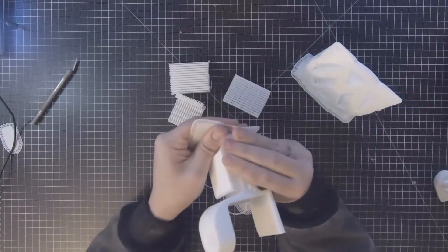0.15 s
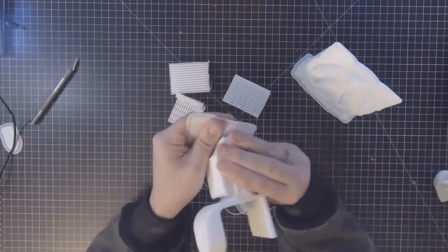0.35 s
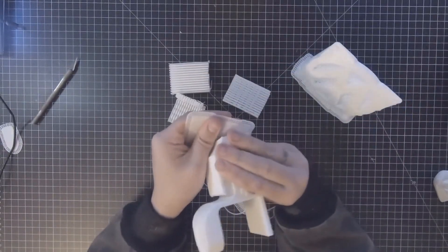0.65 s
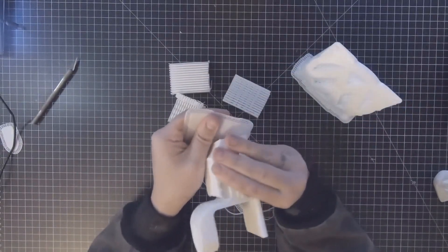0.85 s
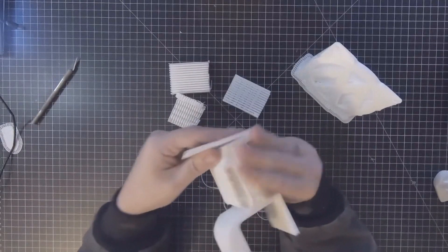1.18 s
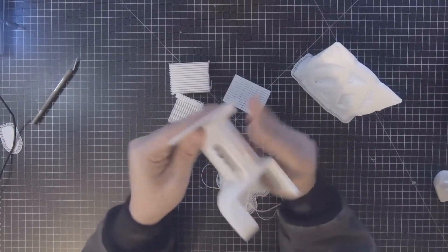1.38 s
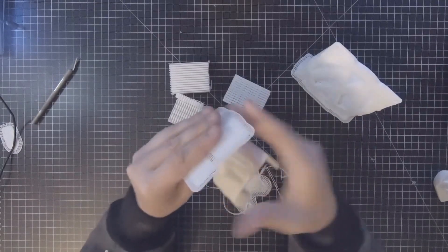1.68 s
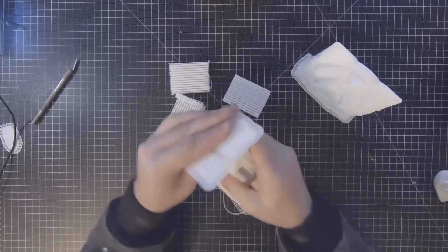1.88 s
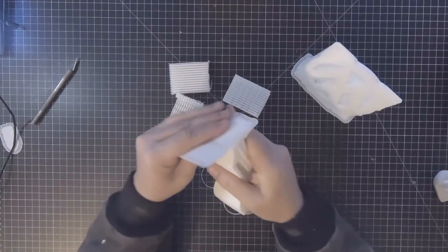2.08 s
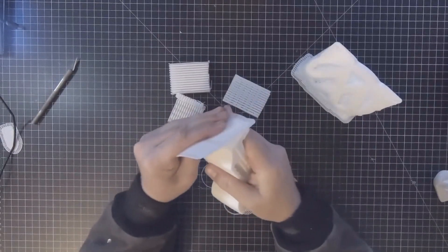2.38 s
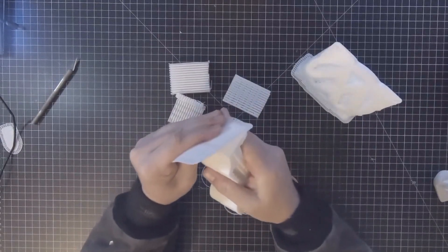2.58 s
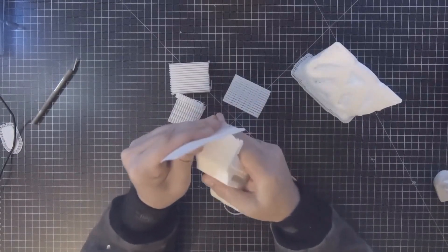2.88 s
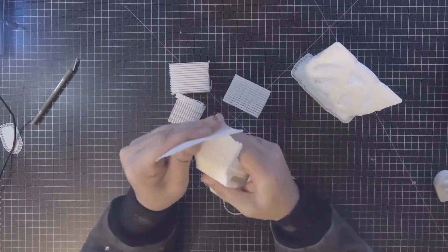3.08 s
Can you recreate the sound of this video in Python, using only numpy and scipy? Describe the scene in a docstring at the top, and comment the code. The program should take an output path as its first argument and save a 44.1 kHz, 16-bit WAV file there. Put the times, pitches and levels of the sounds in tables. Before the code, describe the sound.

Thin plastic supports crack and snap as hands pull them off a printed part. A sharp burst, a pause, then a longer run of snaps, close up in a small room with faint table bumps and machine hum.

```python
"""Thin plastic supports snap as hands tear them off a printed part over a table.
Struts break singly and in bursts, each a short blow of noise that rings the part's modes, some of them
damped by the grip. Fine crackle and finger rustle fill the gaps, and the small room rings on.
Behind this the table is bumped now and then, and a machine hums steadily over soft room noise."""
import sys
import numpy as np
from scipy import signal
from scipy.io import wavfile
from scipy.ndimage import uniform_filter1d

SR = 44100
rng = np.random.default_rng(int(sys.argv[2]) if len(sys.argv) > 2 else 0)


def digitize_waveform(pressure):
    """Quantize a signal to 16-bit integers and store it at the path in sys.argv[1].

    Rows of a 2-D input are taken as channels; values are limited to [-1, 1].
    """
    field = np.atleast_2d(pressure).T
    bounded = np.clip(field, -1, 1)
    quanta = np.round(bounded * 32767).astype(np.int16)
    wavfile.write(sys.argv[1], SR, quanta)


N = 143325

# struts breaking: t/s, level/dB, mid-band offset/dB, low-band offset/dB
SNAPS = [(0.091, -32.5, 10.5, -6), (0.197, -27.5, 4, -10), (0.2052, -24, -5, -4), (0.2156, -22.5, -22, -14),
         (0.3028, -20, -3, -10), (0.3256, -11, 2.5, -1), (0.3332, -15, -22, 6), (0.3369, -18.5, -15, 3),
         (0.342, -20, -18, 14), (0.3465, -14.5, 7.5, 16), (0.3548, -18.5, 8.5, 9), (0.3595, -10.5, 4, 15),
         (0.369, -15, 6, 17), (0.3898, -15.5, -5, -1), (0.5827, -24.5, -27, 5.5), (0.5925, -21.5, -26, 3),
         (0.6529, -28.5, -2.5, 13), (0.6586, -27.5, 6.5, 14), (0.6687, -22, -1.5, 7),
         (0.6727, -16.5, -5.5, -7), (0.7836, -29.5, -15, 6), (0.8761, -26.5, -16, 16),
         (0.882, -15.5, 3.5, 1), (0.8857, -13, -20, 0), (2.0416, -19, -12, -24.5),
         (2.0646, -19.5, 2.5, 9.5), (2.1992, -17.5, -6.5, 8), (2.3254, -36, -7, 5), (2.4019, -36, -3, -2),
         (2.4066, -18.5, -35, 9), (2.4181, -23, -9, 11), (2.5369, -26, -4, 8), (2.5505, -11, -5, 4),
         (2.586, -20.5, -13, 16), (2.6042, -10, -4.5, 6), (2.6698, -12, -2.5, 16),
         (2.6737, -14.5, -2, 16.5), (2.676, -22.5, 1, 21), (2.7429, -17, -3, 8), (2.7514, -31, 5, -6),
         (2.7696, -17, 0, 4), (2.797, -23, -18, 9), (2.8558, -33.5, 4.5, 1), (2.8655, -36, 4, -8),
         (2.8742, -25.5, 1, 4), (2.8853, -12.5, 4, 3), (2.8911, -16, -4, 17.5), (2.9086, -15, 0.5, -10),
         (2.9106, -15, -18, 11.5), (2.9138, -21, -17, -1), (3.14, -21.5, -5, 4), (3.2005, -25, -4, 4)]
def snaps(attack_s=0.0005, decay_s=0.0013):
    """Each breaking strut is one sharp pulse of force: envelopes for the high, mid and low bands."""
    force, t = np.zeros((3, N)), np.arange(1500) / SR
    pulse = (1 - np.exp(-t / attack_s)) * np.exp(-t / decay_s)
    for s, db, mid_db, low_db in SNAPS:
        add(force, s - attack_s, amp(db) * amp([[0], [mid_db], [low_db]]) * pulse)
    return force


# strain on the plastic, the fader for crackle and rustle: t/s, level/dB
STRAIN = [(0, -40), (.05, -50), (.075, -42.5), (.1, -33.5), (.13, -48), (.17, -45.5), (.205, -32),
          (.24, -47), (0.294, -48), (0.319, -26.5), (.35, -15.5), (.40, -35), (.45, -39.5), (.56, -53.5),
          (.59, -38.5), (.63, -60), (.665, -37), (.72, -64), (.85, -53), (1.0, -55.5), (1.2, -56),
          (1.29, -54), (1.345, -68.5), (1.395, -55), (1.459, -70.5), (1.79, -73.5), (1.848, -55.5),
          (1.92, -65.5), (1.96, -59.5), (2.03, -67), (2.1, -58), (2.169, -41.5), (2.23, -59), (2.3, -57),
          (2.34, -54), (2.39, -67), (2.414, -36.5), (2.46, -45), (2.53, -54.5), (2.57, -40), (2.641, -37),
          (2.68, -30), (2.73, -42), (2.79, -37.5), (2.86, -47.5), (2.9, -26.5), (2.92, -28), (2.97, -42),
          (3.1, -53.5), (3.18, -53), (3.25, -54)]
def crackle_and_rustle(ticks_per_s=600, spread_db=6, decay_s=0.0023, crackle_db=-12, rustle_db=-8.5):
    """Tiny random cracks over smooth finger rustle swell with the strain: high, mid and low envelopes."""
    sizes = amp(spread_db * np.minimum(rng.exponential(1, N), 4))
    ticks = sizes * (rng.random(N) < ticks_per_s / SR)
    tail = np.exp(-np.arange(1500) / SR / decay_s)
    crackle = unit_rms(signal.oaconvolve(ticks, tail)[:N])
    texture = np.hypot(amp(crackle_db) * crackle, amp(rustle_db))
    return fader(*np.transpose(STRAIN)) * texture * amp([[0], [0.5], [8]])


# the part's body, bite and sizzle resonances: f/Hz, width/Hz, level/dB
LOW_MODES = [(800, 170, -21), (1440, 180, -16.5), (1901, 170, -13.5)]
MID_MODES = [(3730, 513, 3), (5200, 610, -14.5)]
HIGH_MODES = [(6030, 2740, 4), (7680, 1510, 12.5), (9586, 1410, 8), (10330, 1140, 7), (12200, 4500, -4),
              (15900, 570, -24)]
# resonances that the fingers damp: f/Hz, width/Hz, level/dB
HELD_MODES = [(2628, 120, 0), (3186, 180, 0), (4407, 640, 0.0058), (6180, 1130, 0.016)]
# how free the grip leaves the four held modes: t/s, then level/dB for each
GRIP = [(.3, 7, 0.5, -13, -27), (.6, 9.5, 3, 2.5, -10), (0.859, -10, 7.5, -7, -9), (1.35, -9.5, 7, 5, -1.5),
        (1.899, -11, -8, 10, 2), (2.06, 9.5, -28, 10, 6.5), (2.45, -17, -39, 6.5, 6.5),
        (2.6, -5, 0, 0.5, -38)]
def plastic(stereo_width=0.36, low_cut_hz=2300):
    """Snaps, crackle and rustle gate noise, direct and as room echo, that rings the part's modes."""
    high, mid, low = np.hypot(snaps(), crackle_and_rustle())
    centre, side = rng.choice([-1., 1.], (2, N))
    side = stereo_width * side + resonance(side, hz=8500, width_hz=1800, db=-14)  # wider in the treble
    direct, diffuse = np.array([centre + side, centre - side]), diffuse_noise()

    def excite(force, hz, width_hz, db):
        return resonance(force * direct + echo_envelope(force, hz) * diffuse, hz, width_hz, db)

    def bank(force, modes):
        return sum((-1) ** k * excite(force, *mode) for k, mode in enumerate(modes))

    grip_s, *free_db = np.transpose(GRIP)
    held = sum(excite(force * fader(grip_s, db), *mode)
               for force, db, mode in zip((mid, mid, mid, high), free_db, HELD_MODES))
    bright = bank(high, HIGH_MODES) + bank(mid, MID_MODES) + held
    low_cut = signal.butter(6, low_cut_hz, "high", fs=SR, output="sos")  # thin struts radiate few lows
    return signal.sosfilt(low_cut, bright) + bank(low, LOW_MODES)


# reverb time of the small room: f/Hz, t60/s
ROOM_DECAY = [(700, 0.8), (2000, 0.77), (4000, 0.26), (5500, 0.41), (10000, 0.35), (15000, 0.15)]
def echo_envelope(force, hz, send_db=-5, predelay_s=0.0016, build_s=0.0032):
    """The power of the blows builds up in the room, then dies with the reverb time at hz."""
    power = np.pad(force ** 2, (round(predelay_s * SR), 0))[:N]
    decay_s = curve_at(ROOM_DECAY, hz) / np.log(1e6)
    return amp(send_db) * np.sqrt(smooth(smooth(power, build_s), decay_s))


def diffuse_noise(mode_width_hz=40, correlation=0.65):
    """Stereo noise for the echo, coloured by the room's many narrow resonances."""
    noise = rng.standard_normal((3, N))
    reflections = rng.standard_normal((3, 2000)) * np.exp(-np.pi * mode_width_hz * np.arange(2000) / SR)
    coloured = unit_rms(signal.oaconvolve(noise, reflections, axes=1)[:, :N])
    return np.sqrt(correlation) * coloured[2] + np.sqrt(1 - correlation) * coloured[:2]


# bumps on the table: t/s, level/dB, deep-mode offset/dB
BUMPS = [(.365, -24, -25), (1.018, -40, -7), (1.075, -26, -23), (1.109, -34.5, -3), (1.448, -39, -5),
         (1.568, -34, -20), (2.141, -33, -21), (2.751, -58, -4), (3.18, -45, -6)]
# the table's upper and deep modes: f/Hz, t60/s
TABLE_MODES = [(137.2, 0.15), (52, 0.24)]
def table_bumps(attack_s=0.004, left_db=-17):
    """Soft pushes ring the two modes of the table, mostly on the right."""
    thuds, t = np.zeros(N), np.arange(SR // 3) / SR
    for s, db, deep_db in BUMPS:
        ringing = sum(amp(db + offset_db - 60 * t / t60) * np.sin(2 * np.pi * hz * t)
                      for offset_db, (hz, t60) in zip((0, deep_db), TABLE_MODES))
        add(thuds, s, (1 - np.exp(-t / attack_s)) * ringing)
    return thuds * amp([[left_db], [0]])


# machine partials, by multiple of the shaft speed: left level/dB, right level/dB
HUM_PARTIALS = {5: (-80, -69.5), 6: (-75.5, -47.5), 7: (-51.5, -52), 8: (-86.5, -56.5), 14: (-70, -75)}
def machine_hum(shaft_hz=24.87, waver_turns=0.01, waver_db=1.2):
    """Neighbouring multiples of one slightly unsteady shaft speed beat against each other."""
    turns = shaft_hz * np.arange(N) / SR + waver_turns * drift(4) + rng.random()
    hum = np.zeros((2, N))
    for multiple, (left_db, right_db) in HUM_PARTIALS.items():
        rms = amp([[left_db], [right_db]] + waver_db * drift(6.8))
        hum += np.sqrt(2) * rms * np.cos(2 * np.pi * multiple * turns)
    return hum


# room tone colour: f/Hz, relative level/dB
TONE_SPECTRUM = [(25, -11.5), (60, -14.5), (110, -19.5), (160, 1), (220, -8.5), (280, -15.5), (500, -17),
                 (800, -17), (1200, -22.5), (2500, -27.5), (4500, -41), (7500, -40.5), (10000, -58),
                 (12000, -64), (14000, -86)]
# its stereo image: f/Hz, left-right correlation
TONE_CORRELATION = [(30, 0.42), (150, 0.43), (300, -0.23), (600, -0.74), (1400, -0.47), (3000, -0.51),
                    (7000, .05)]
# its balance: f/Hz, left minus right/dB
TONE_PAN = [(60, -5.5), (550, -1.5), (1650, 0.5), (4970, -2), (15000, 12.5)]
def room_tone(level_db=-53.5, patch_db=1.6):
    """A dark bed of room noise with faint patches drifting through its spectrum."""
    frames, hz = N // 512 + 5, np.fft.rfftfreq(2048, 1 / SR)
    left_re, left_im, other_re, other_im, patches = rng.standard_normal((frames, 1025, 5)).T
    patches = unit_rms(uniform_filter1d(uniform_filter1d(patches, 16, axis=0), 6, axis=1))
    correlation = curve_at(TONE_CORRELATION, hz)[:, None]
    left = left_re + 1j * left_im
    right = correlation * left + np.sqrt(1 - correlation ** 2) * (other_re + 1j * other_im)
    pan = amp(curve_at(TONE_PAN, hz)[:, None] / 2)
    colour = amp(curve_at(TONE_SPECTRUM, hz)[:, None] + patch_db * patches)
    _, bed = signal.istft(np.array([left * pan, right / pan]) * colour, nperseg=2048, noverlap=1536)
    return amp(level_db) * unit_rms(bed[:, :N])


def amp(db):
    return 10 ** (np.asarray(db) / 20)


def unit_rms(x):
    return x / np.sqrt(np.mean(x ** 2) + 1e-20)


def fader(times_s, levels_db):
    return amp(np.interp(np.arange(N) / SR, times_s, levels_db))


def curve_at(points, hz):
    f, value = np.transpose(points)
    return np.interp(np.log(hz + 1), np.log(f + 1), value)


def add(mix, start_s, sound):
    part = mix[..., round(start_s * SR):][..., :sound.shape[-1]]
    part += sound[..., :part.shape[-1]]


def resonance(x, hz, width_hz, db):
    return amp(db) * signal.lfilter(*signal.iirpeak(hz, hz / width_hz, SR), x)


def smooth(x, lag_s):
    pole = np.exp(-1 / (lag_s * SR))
    return signal.lfilter([1 - pole], [1, -pole], x)


def drift(top_hz):
    """Slow random wander of rms 1."""
    t, rates = np.arange(N) / SR, np.geomspace(top_hz / 8, top_hz, 10)
    return unit_rms(sum(np.sin(2 * np.pi * (hz * t + rng.random())) / np.sqrt(hz) for hz in rates))


def scene():
    """The plastic up front, a touch to the right, over hum, room tone and bumps."""
    return plastic() * amp([[-0.35], [0.35]]) + machine_hum() + room_tone() + table_bumps()


def record(dry):
    """A steep high cut at 16 kHz on the whole mix."""
    high_cut = signal.firwin(511, 16000, window=("kaiser", 9), fs=SR)
    return signal.oaconvolve(dry, high_cut[None], "same")


dry = scene()
out = record(dry)
digitize_waveform(out)
```